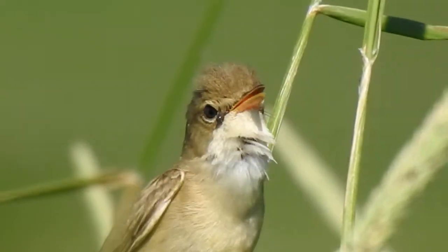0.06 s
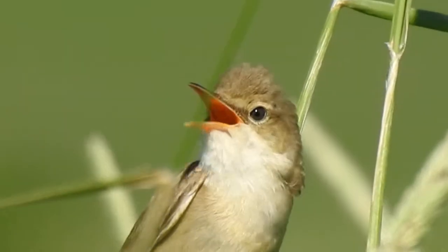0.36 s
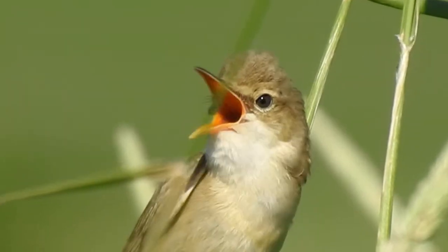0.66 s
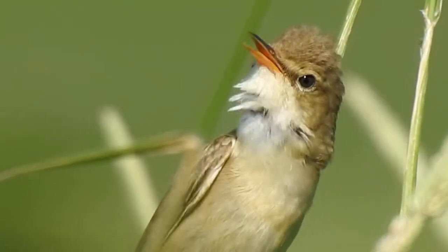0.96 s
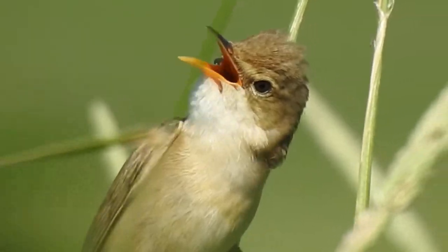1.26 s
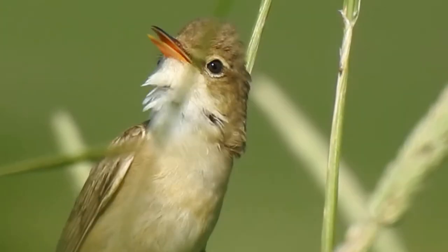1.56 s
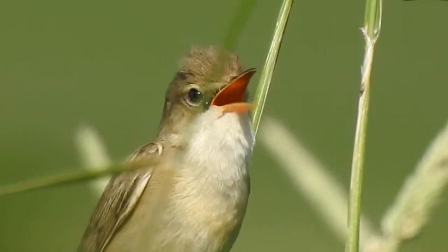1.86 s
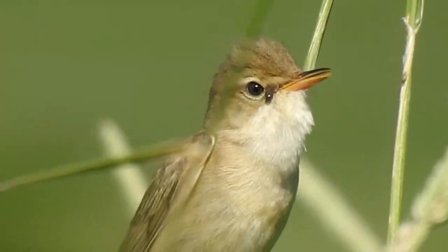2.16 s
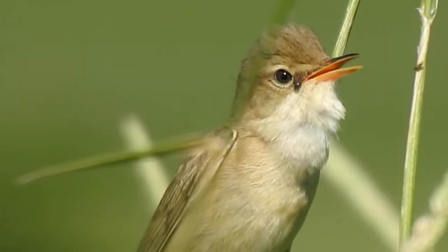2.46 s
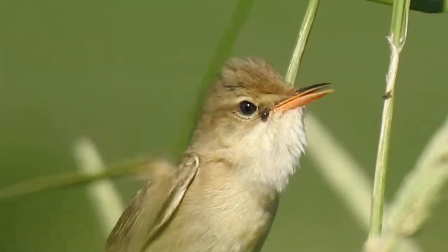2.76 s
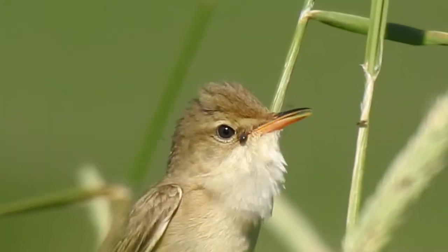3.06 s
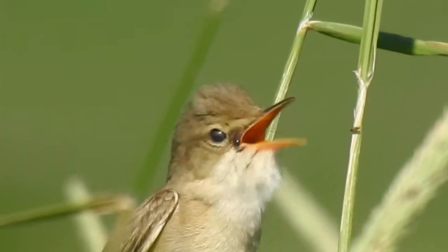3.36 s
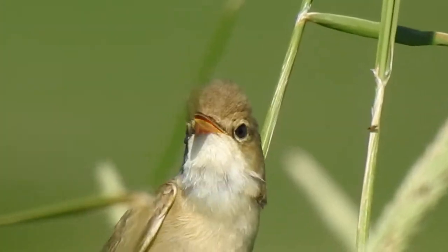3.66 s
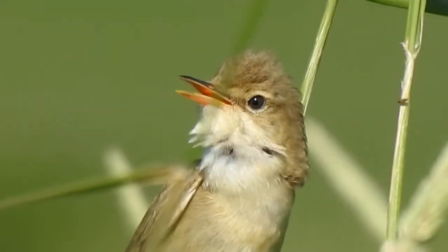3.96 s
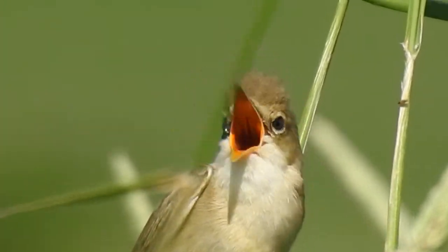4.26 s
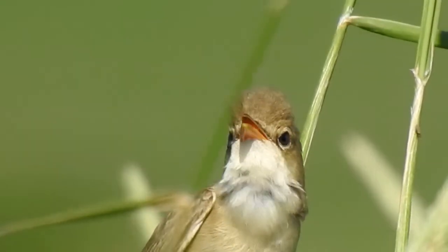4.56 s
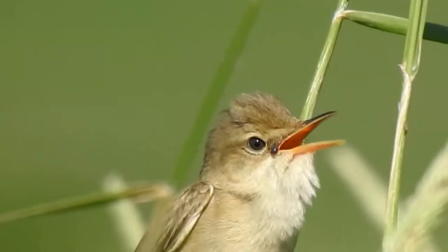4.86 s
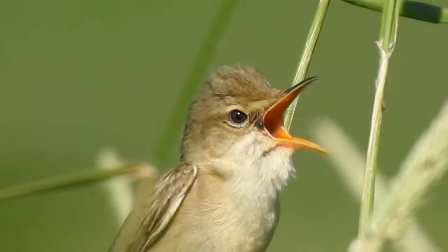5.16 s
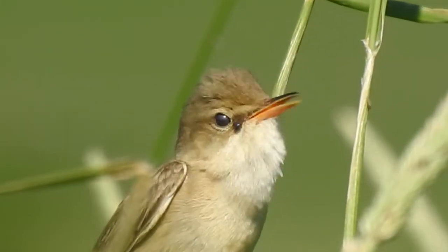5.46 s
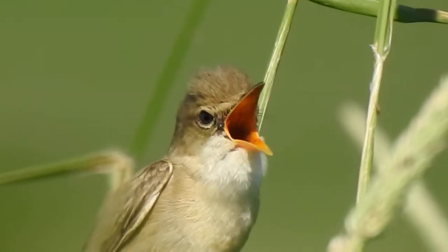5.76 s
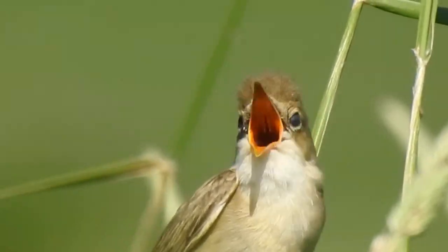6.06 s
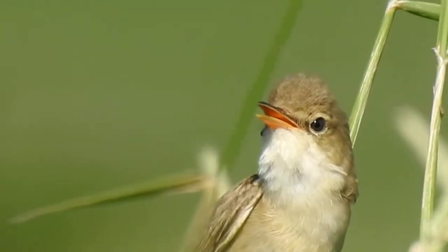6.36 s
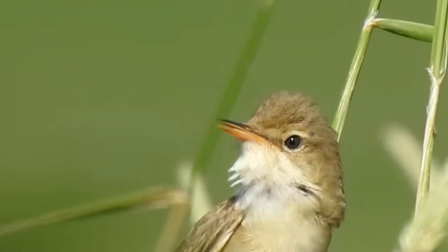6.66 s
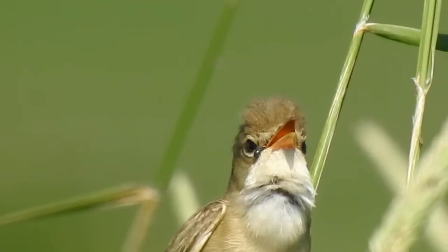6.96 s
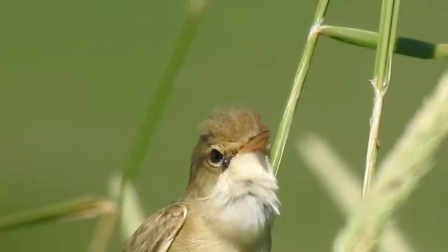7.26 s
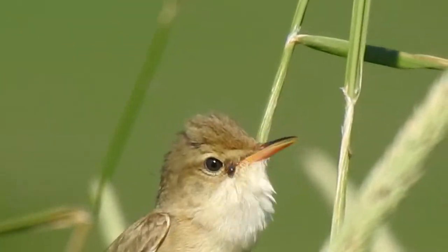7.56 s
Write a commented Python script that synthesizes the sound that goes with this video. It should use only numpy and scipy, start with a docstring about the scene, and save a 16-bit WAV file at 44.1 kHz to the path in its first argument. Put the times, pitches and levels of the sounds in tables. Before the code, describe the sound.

Close to the microphone and a little to the left, a small bird delivers a hurried, varied song among reeds. Scratchy falling whistles and descending trills come first, followed by a repeating mix of short rising calls, buzzy nasal notes, harsh chacks, ticks and climbing trills. Its beak clicks once toward the end. Light wind rustles and rumbles softly, while other birds twitter and a faint tone hums far away.

```python
"""In a reed bed, a warbler sings close to a two-port stereo microphone, a little to the left.
Rasps fall into whistles and trills; then come "wit" calls, nasal notes, chacks, rising series and slurs.
One syrinx makes every note and the throat picks which harmonic carries; the beak snaps once.
Stems scatter the song. Far off, other birds whistle and a thin tone hums; a light wind rustles and rumbles."""
import sys
import numpy as np
from scipy import signal
from scipy.fft import rfft, irfft
from scipy.io import wavfile

SR = 44100
rng = np.random.default_rng(int(sys.argv[2]) if len(sys.argv) > 2 else 0)


def master_out(mix):
    """Clip the mix to full scale and print it as 16-bit PCM to the path in sys.argv[1]."""
    frames = np.transpose(np.atleast_2d(mix))
    ceiling = np.clip(frames, -1, 1)
    pcm = np.round(ceiling * 32767).astype(np.int16)
    wavfile.write(sys.argv[1], SR, pcm)


N = 344862
TOP_HZ = 15750
NASAL_S, PEEP_S = .072, .026  # note lengths

# throat responses with the beak wide open, nearly closed, and set for pure notes: f/Hz, level/dB
OPEN_BEAK = [(700, -63), (2000, -49), (2800, -21), (3600, -11), (4500, -10.5), (5500, 5.5), (6500, 6),
             (7200, -12), (8000, -29.5), (10000, -39), (15000, -71)]
CLOSED_BEAK = [(700, -41), (1500, -16), (2200, 5.5), (2950, 15.5), (3400, 9), (3850, 1), (5000, -2),
               (6000, -2), (7200, -43), (9000, -56)]
PURE_THROAT = [(2000, 29), (4000, 11), (6600, 3), (7400, -18.5), (8100, -13), (14000, -45)]
# whistles, each led in by a rasp: t/s, length/s, top/Hz, shelf/Hz, settling/s, whistle/dB, rasp/dB
RASPED_WHISTLES = [(0.102, 0.12, 3990, 3245, 0.038, -25.5, -28.5),
                   (0.541, 0.1, 3800, 3120, .018, -23.5, -25), (1.01, 0.11, 4360, 3290, 0.015, -22.5, -25),
                   (1.54, 0.14, 4770, 3540, 0.021, -21.5, -24.5),
                   (2.041, 0.11, 3980, 3190, 0.022, -22.5, -24.5)]
# soft nasal notes: t/s, top f/Hz, level/dB
NASAL_NOTES = [(2.445, 729, -37.5), (3.201, 753, -33.5), (3.586, 728, -36.5), (3.999, 731, -37),
               (4.693, 727, -33.5), (5.647, 730, -34), (6.334, 728, -35.5), (7.008, 724, -33.5)]
# short peeps about an octave above them: t/s, f/Hz, level/dB
NASAL_PEEPS = [(4.488, 1574, -29.5), (5.401, 1560, -29), (6.812, 1740, -29.5), (7.737, 1660, -29.5)]
# chacks, each followed by a tick: t/s, top f/Hz, chack/dB, tick/dB
CHACK_CALLS = [(2.733, 923, -19.5, -15.5), (4.909, 923, -21.5, -16), (5.871, 942, -19, -14),
               (7.222, 733, -21.5, -14)]


def undb(db):
    """Decibels to gain."""
    return 10 ** (np.asarray(db) / 20)


def colour(points, hz):
    """Gain of a spectrum (f/Hz, level/dB) at the given frequencies."""
    f, db = np.transpose(points)
    return undb(np.interp(np.log(np.maximum(hz, 1)), np.log(f), db))


def noise(points, size):
    """Coloured noise of rms 1."""
    x = irfft(rfft(rng.standard_normal(size)) * colour(points, np.fft.rfftfreq(size, 1 / SR)), size)
    return x / x.std()


def wide_noise(points, alike_hz=5000):
    """Diffuse sound at two close microphone ports: fairly unlike in the bass, most alike just above it, less so
    again toward the treble."""
    side = [(hz, db - (10 * np.log10(1 + (alike_hz / hz) ** 1.1) if hz > 350 else 3))
            for hz, db in points]
    hz = np.fft.rfftfreq(N, 1 / SR)
    share = np.linalg.norm(colour(side, hz)) / np.linalg.norm(colour(points, hz))
    return noise(points, N) + share * noise(side, N) * np.array([[1], [-1]])


def wander(size, rate):
    """Random values drawn `rate` times a second and joined by lines."""
    at = np.arange(size) * rate / SR
    count = int(at[-1]) + 2
    return np.interp(at, np.arange(count), rng.standard_normal(count))


def ramp(length):
    """Progress 0-1 through a note of `length` seconds."""
    return np.linspace(0, 1, max(int(length * SR), 2))


def swell(u, loudest):
    """A rise and fall that peaks at the share `loudest` of the note."""
    return np.sin(np.pi * np.interp(u, [0, np.clip(loudest, .05, .95), 1], [0, .5, 1])).clip(0)


def bend(u, first, middle, last):
    """A smooth bend of pitch through three points over the progress 0-1."""
    return np.polyval(np.polyfit([0, .5, 1], [first, middle, last], 2), u)


def beats(length, spacing, first_share, settled):
    """Times of pulses that start hurried and reach their steady spacing after `settled` beats."""
    gaps = spacing * np.interp(np.arange(int(2 * length / spacing)), [0, settled], [first_share, 1])
    t = np.append(0, np.cumsum(gaps))
    return t[t < length]


def add(out, start, x):
    """Mix a sound in at `start` seconds."""
    i = max(int(start * SR), 0)
    out[i:i + len(x)] += x[:max(len(out) - i, 0)]


def syrinx(hz, throat, rough, slope_db):
    """Vibrating labia: harmonics shaped by the throat; roughness unsettles period and strength."""
    hz = hz * (1 + .1 * rough * wander(len(hz), 900))
    k = np.arange(1, int(TOP_HZ / hz.min()) + 1)[:, None]
    weight = colour(throat, k * hz) * undb(slope_db * np.log2(k)) * (k * hz < TOP_HZ)
    lag = np.arctan((k * hz - 6000) / 700)  # the windpipe's resonance rings on after each pulse
    stack = np.sum(weight * np.sin(2 * np.pi * k * np.cumsum(hz) / SR - 2 * lag), 0)
    shimmer = 1 + np.clip(rough, 0, .6) * np.tanh(wander(len(hz), 870))
    return stack / np.sqrt(np.sum(weight ** 2, 0)) * shimmer


def notes(table, throat, slope_db, sharpness):
    """Notes whose pitch bends through three points while the air pressure swells and falls."""
    out = np.zeros(N)
    for start, length, first, middle, last, db, loudest, rough in table:
        u = ramp(length)
        tone = syrinx(bend(u, first, middle, last), throat, rough, slope_db)
        add(out, start, undb(db) * swell(u, loudest) ** sharpness * tone)
    return out


def glides(curves, throat, slope_db, quaver_hz, depth, throb_db, calm):
    """Falling notes that start smooth and then quaver in pitch and strength."""
    out = np.zeros(N)
    for curve in curves:
        s, hz, db = np.transpose(curve)
        u = ramp(s[-1] - s[0])
        t = s[0] + u * (s[-1] - s[0])
        turn = 2 * np.pi * np.cumsum(quaver_hz * (1 + .11 * wander(len(u), 63.5))) / SR
        grown = np.clip((u - calm) / .59, .15, 1)
        pitch = np.interp(t, s, hz) * (1 + depth * grown * np.sin(turn))
        flutter_db = throb_db * (.4 - np.sin(turn + 1)) + wander(len(u), 148)
        gain = undb(np.interp(t, s, db) + grown * flutter_db) * np.minimum(swell(u, .39) * 20, 1)
        add(out, s[0], gain * syrinx(pitch, throat, .27, slope_db))
    return out


def wind(rustle_trim_db=1, rumble_trim_db=-1, air_db=-54.5):
    """Gusts rustle the reeds around the microphone over still air; a low rumble comes and goes."""
    # spectra of the leaves, the rumble and still air: f/Hz, level/dB
    rustle_spectrum = [(110, -11), (200, -5), (450, -9.5), (750, -4), (1150, -0.5), (1750, -7.5),
                       (2400, -20), (5000, -26.5), (10000, -65)]
    rumble_spectrum = [(20, -39), (40, -21.5), (60, -4.5), (76, -2), (100, -10.5), (140, -21), (300, -57)]
    air_spectrum = [(100, 2.5), (400, -12.5), (1000, -2), (2000, -6.5), (3200, -6), (6000, -8.5),
                    (8000, -15.5), (15500, -27)]
    # course of the rustle and of the rumble, before trim: t/s, level/dB
    gusts = [(0.0, -45), (0.35, -47), (0.95, -49), (1.39, -46.5), (1.8, -50), (2.41, -46.5), (2.71, -52.5),
             (3.87, -53), (4.36, -53), (4.93, -46.5), (5.97, -55.5), (6.52, -50), (6.86, -54.5), (7.8, -54)]
    rumble_swells = [(0.0, -69), (0.69, -74), (0.91, -48.5), (1.17, -69.5), (2.56, -68), (2.8, -47),
                     (2.89, -67), (2.98, -46.5), (4.06, -52.5), (4.08, -46), (4.97, -72), (5.49, -53),
                     (6.54, -62), (6.69, -52), (7.6, -49), (7.8, -55)]
    t = np.arange(N) / SR
    leaves = wide_noise([(40, -38), *rustle_spectrum])
    leaves *= undb(np.interp(t, *np.transpose(gusts)) + rustle_trim_db + wander(N, 13))
    rumble = noise(rumble_spectrum, N) + .084 * noise(rumble_spectrum, N) * np.array([[1], [-1]])
    rumble *= undb(np.interp(t, *np.transpose(rumble_swells)) + rumble_trim_db)
    return leaves + rumble + undb(air_db) * wide_noise([(40, -20.5), *air_spectrum])


def hum(hz=702):
    """A thin tone in the distance swells and fades."""
    t = np.arange(N) / SR
    level_db = np.interp(t, [0, 2.5, 3, 6.1, 6.45, 6.8], [-62.5, -59, -73, -71.5, -50.5, -65])
    return undb(level_db + 2 * wander(N, 32)) * np.sin(2 * np.pi * hz * t)


def rasps(lead_s=.045, squeak_lead_s=.015):
    """Slow pulses speed up, then break into a rising squeak just before the whistle."""
    pulses = [(s - lead_s, .047, 520, 660, 1150, db, .7, .5) for s, *_, db in RASPED_WHISTLES]
    squeaks = [(s - squeak_lead_s, .016, 2350, 2900, 3800, db + 4, .5, .05)
               for s, *_, db in RASPED_WHISTLES]
    return notes(pulses + squeaks, OPEN_BEAK, slope_db=-3.5, sharpness=.89)


def whistles(sag_hz_per_s=7500, fade_s=.073, fade_db=-23):
    """Each whistle drops from its top to a shelf, sags steadily and fades at the end."""
    curves = []
    for start, length, top, shelf, settle, db, _ in RASPED_WHISTLES:
        t = ramp(length) * length
        hz = shelf + (top - shelf) * np.exp(-(t / settle) ** 2) - sag_hz_per_s * t
        fade = np.maximum(1 - (length - t) / fade_s, 0)
        curves.append(np.transpose([start + t, hz, db + fade_db * fade]))
    return glides(curves, PURE_THROAT, slope_db=-5, quaver_hz=140.5, depth=.11, throb_db=4, calm=.24)


def trill_pips(spacing_s=.0141, lead_s=.01, lead_db=-19, scatter_db=1.5, fade_db=-3):
    """Rows (t/s, f/Hz, level/dB): after a soft lead-in, pips fall out of the throat's resonance."""
    # falling trills: first full pip t/s, length/s, start/Hz, middle/Hz, end/Hz, base level/dB
    falls = [(0.3148, .146, 6170, 5010, 3850, -18), (0.7825, .126, 6270, 5370, 3420, -17),
             (1.27, .17, 6530, 4560, 3600, -21), (1.79, 0.15, 6320, 5180, 4336, -19)]
    # loudness follows pitch: f/Hz, gain/dB
    resonance = [(3600, -18.5), (4500, -13.5), (5200, -6.5), (5800, 1.5), (6600, -0.5)]
    rows = []
    for start, length, first, middle, last, db in falls:
        t = np.append(-lead_s, beats(length, spacing_s, first_share=.73, settled=1.3))
        hz = bend(t / length, first, middle, last)
        level = db + 20 * np.log10(colour(resonance, hz)) + fade_db * t / length
        level += lead_db * (t < 0) + scatter_db * rng.standard_normal(len(t))
        rows += zip(start + t, hz, level)
    return rows


def trills(pips, fall=.27):
    """Each pip is a quick downward flick; the low ones last longer."""
    out = np.zeros(N)
    for s, hz, db in pips:
        length = .0057 * (6000 / hz) ** 2
        u = ramp(length)
        pip = syrinx(hz * np.exp(-fall * (u - .45)), PURE_THROAT, rough=.19, slope_db=-10)
        add(out, s - .45 * length, undb(db) * swell(u, .46) ** 2 * pip)
    return out


def overtone_flicks(table, length, trough_hz, flick_db, follow=.61):
    """Between pulses the pitch dips; its second harmonic flicks through the open throat's resonance."""
    out, u = np.zeros(N), ramp(length)
    for s, hz, db, *_ in table:
        trough = min(trough_hz, .5 * hz)
        pitch = (hz - (hz - trough) * (2 * u - 1) ** 2) * (1 + .03 * wander(len(u), 900))
        tone = colour(OPEN_BEAK, 2 * pitch) * np.sin(4 * np.pi * np.cumsum(pitch) / SR)
        gate = np.minimum(swell(u, .51) * 10, 1)
        add(out, s - length / 2, undb(flick_db + follow * db) * gate * tone)
    return out


def far_birds(trill_hz=55, depth=.017):
    """Thin whistles and trills from across the reed bed."""
    # distant whistles: t/s, length/s, start/Hz, middle/Hz, end/Hz, level/dB
    far_whistles = [(0.909, 0.051, 4240, 3840, 3340, -48), (1.123, 0.046, 3740, 4040, 2970, -54),
                    (2.874, 0.16, 4370, 4200, 4850, -51.5), (3.257, 0.1, 4350, 4500, 4170, -54),
                    (3.504, 0.19, 4080, 4440, 4600, -51), (3.7, 0.043, 5930, 5920, 5760, -50),
                    (4.005, 0.042, 4680, 4400, 4100, -49), (4.763, 0.03, 6120, 5980, 5950, -47.5)]
    # distant trills: t/s, length/s, f/Hz, level/dB
    far_trills = [(3.802, 0.2, 4790, -50), (4.145, 0.26, 4740, -49.5)]
    out = notes([(*row, .5, .18) for row in far_whistles], PURE_THROAT, slope_db=-25, sharpness=.2)
    for start, length, hz, db in far_trills:
        turn = 2 * np.pi * trill_hz * length * ramp(length)
        tone = syrinx(hz * (1 + depth * np.sin(turn)), PURE_THROAT, rough=.23, slope_db=-32)
        add(out, start, undb(db) * np.abs(np.cos(turn / 2)) * tone)
    return out


def twitter(count=30, db=-57):
    """Scattered faint chirps from deeper in the reeds."""
    rows = []
    for when, span, high, curve in rng.random((count, 4)):
        hz = 3200 + 3000 * high
        pitches = hz, hz * (.9 + .15 * curve), hz * (.8 + .5 * curve)
        rows.append((when * N / SR, .025 + .033 * span, *pitches, db, .5, .3))
    return notes(rows, PURE_THROAT, slope_db=-39, sharpness=.98)


def wits(leap_s=.021, scrape_lead_s=.013):
    """A falling chirp and a scrape turn into a rising sweep; the beak opens on its second harmonic."""
    # "wit" calls: sweep t/s, chirp lead/s, chirp/dB, scrape/dB, sweep/dB, squeak/dB
    calls = [(2.345, 0.027, -31, -36, -24.5, -33), (3.479, 0.028, -32, -42, -27, -32),
             (3.888, 0.023, -27, -38, -21.5, -27), (4.583, 0.018, -37, -27.5, -24.5, -32),
             (5.525, .031, -30, -28.5, -21.5, -25), (6.908, .025, -28, -27.5, -22.5, -24)]
    leads, sweeps, squeaks = [], [], []
    for s, lead, chirp_db, scrape_db, sweep_db, squeak_db in calls:
        leads.append((s - lead, .013, 5500, 3750, 2830, chirp_db, .58, .8))
        leads.append((s - scrape_lead_s, .016, 3300, 2950, 3100, scrape_db, .5, 1.1))
        sweeps.append((s, .026, 2150, 3600, 3900, sweep_db, .6, .45))
        squeaks.append((s + leap_s, .021, 2950, 3420, 3630, squeak_db, .3, .3))
    return (notes(leads, PURE_THROAT, slope_db=2, sharpness=.87)
            + notes(sweeps, PURE_THROAT, slope_db=-4.5, sharpness=1.5)
            + notes(squeaks, OPEN_BEAK, slope_db=1, sharpness=1.5))


def nasal_notes():
    """Low, buzzy arches and short peeps, muffled by the nearly closed beak."""
    low = [(s, NASAL_S, .93 * hz, hz, .93 * hz, db, .7, .17) for s, hz, db in NASAL_NOTES]
    peeps = [(s, PEEP_S, 1.02 * hz, hz, .98 * hz, db, .7, .097) for s, hz, db in NASAL_PEEPS]
    return notes(low + peeps, CLOSED_BEAK, slope_db=-4.5, sharpness=.89)


def rough_tails(stretch=2.84, below_db=-9):
    """After each nasal note come a few soft, stuttering scrapes, coloured by the same nearly closed beak."""
    out = np.zeros(N)
    for table, length in (NASAL_NOTES, NASAL_S), (NASAL_PEEPS, PEEP_S):
        for start, _, db in table:
            u = ramp(stretch * length)
            stutter_hz = rng.uniform(24.75, 37.5)
            stutter = np.sin(np.pi * stutter_hz * np.arange(len(u)) / SR) ** 4
            scrapes = (1 - u) ** 1.1 * stutter * noise(CLOSED_BEAK, len(u))
            add(out, start + .37 * length, undb(db + below_db) * scrapes)
    return out


def chacks(length=.06, rough=.2):
    """A low pulse train arches in pitch and rings the open throat."""
    arches = [(s, length, .82 * hz, hz, .68 * hz, db, .5, rough) for s, hz, db, _ in CHACK_CALLS]
    return notes(arches, OPEN_BEAK, slope_db=-5.5, sharpness=1.27)


def ticks(after_s=.096, creak_db=-15):
    """After each chack a short creak opens into a very fast upward sweep."""
    creaks, flicks = [], []
    for s, *_, db in CHACK_CALLS:
        creaks.append((s + after_s - .009, .025, 550, 800, 1400, db + creak_db, .5, .5))
        flicks.append((s + after_s - .001, .014, 3300, 5600, 7900, db, .55, .1))
    return (notes(creaks, OPEN_BEAK, slope_db=-9, sharpness=1)
            + notes(flicks, PURE_THROAT, slope_db=-11, sharpness=3.2))


def series_arches(climb_s=.035, leap_s=.009, arch_s=.015):
    """Rows (t/s, f/Hz, level/dB, length/s): notes climb to a shelf, then leap to the top."""
    # rising series: t/s, length/s, spacing/s, start/Hz, shelf/Hz, top/Hz, leap after/s,
    # top note length/s, base level/dB
    climbs = [(2.9547, .153, .0189, 2050, 3700, 6030, .105, .022, -10.5),
              (5.1355, .165, .0204, 2700, 4150, 7400, .135, .018, -14),
              (6.0845, .145, .0205, 2260, 3900, 5820, .094, .025, -9),
              (7.4522, .161, .0199, 2330, 4100, 6020, .111, .014, -9)]
    # loudness follows pitch: f/Hz, gain/dB
    resonance = [(2200, -28.5), (3000, -22), (3600, -11), (4250, -14), (5000, -9.5), (5750, 0), (6100, -4),
                 (7150, -13)]
    rows = []
    for start, length, spacing, first, shelf, top, leap_at, top_length, db in climbs:
        t = beats(length, spacing, first_share=.84, settled=4)
        leap = 1 / (1 + np.exp((leap_at - t) / leap_s))
        hz = shelf + (first - shelf) * np.exp(-t / climb_s) + (top - shelf) * leap
        level = db + 20 * np.log10(colour(resonance, hz))
        held = leap ** 5
        rows += zip(start + t, hz, level, (1 - held) * arch_s + held * top_length)
    return rows


def rising_series(arches, depth=.375, trim_db=.5):
    """Each note arches up and down, loudest at its top; the highest are flatter, fuller and cleaner."""
    out = np.zeros(N)
    for s, hz, db, length in arches:
        high = np.clip((hz - 5200) / 700, 0, 1)
        u = ramp(length)
        droop = np.abs(2 * u - 1) ** (2 + high)
        pressure = swell(u, .5) ** (2.3 - .6 * high)
        pitch = hz * (1 + depth * (.04 - droop))
        tone = syrinx(pitch, PURE_THROAT, rough=.3 - .23 * high, slope_db=-20)
        add(out, s - length / 2, undb(db + trim_db) * pressure * tone)
    return out


def slurs():
    """Falling, quavering slurs with the beak wide open."""
    # one curve a slur, each point: t/s, f/Hz, level/dB
    curves = [
        [(4.272, 4000, -64.5), (4.293, 3230, -19), (4.32, 2984, -17.5), (4.348, 2670, -22), (4.366, 2560, -45)],
        [(6.59, 3750, -40.5), (6.606, 3080, -15), (6.628, 2740, -16.5), (6.652, 2710, -19.5),
         (6.672, 2620, -31)],
    ]
    return glides(curves, OPEN_BEAK, slope_db=-.5, quaver_hz=114.8, depth=.21, throb_db=-9, calm=.403)


def crackles():
    """Low, rough pulse trains crackle and whine through the wide-open beak."""
    # harsh notes: t/s, length/s, start/Hz, middle/Hz, end/Hz, level/dB, loudest at/0-1, roughness/0-1
    harsh_notes = [(4.39, 0.03, 640, 1400, 520, -17, 0.42, 0.7),
                   (6.707, 0.034, 1600, 500, 2100, -15, 0.28, 0.2),
                   (5.411, 0.047, 1410, 1572, 1360, -34, 0.5, 0.2),
                   (7.744, 0.0235, 1900, 1590, 1540, -33, 0.9, 0.44)]
    return notes(harsh_notes, OPEN_BEAK, slope_db=2.5, sharpness=1.8)


def chirps(length=.0086):
    """Lone upward flicks of the syrinx."""
    # quick chirps: t/s, level/dB
    onsets = [(4.551, -27), (6.875, -32), (7.807, -30)]
    flicks = [(s, length, 2680, 3430, 4700, db, .5, .2) for s, db in onsets]
    return notes(flicks, PURE_THROAT, slope_db=-8, sharpness=.94)


def beak_snap(start_s=7.683, db=-17.5):
    """The mandibles click shut once."""
    spectrum = [(300, -2), (2000, -6), (4500, 10), (7000, 6), (10000, -13), (13000, -13), (15000, -31)]
    out, u = np.zeros(N), ramp(.037)
    envelope = np.exp(-22.35 * u) * np.minimum(u * 20, 1)
    add(out, start_s, undb(db) * envelope * noise(spectrum, len(u)))
    return out


def reeds(x, near_db, far_db, near_t60=.062, far_t60=.2):
    """Nearby stems scatter the sound at once; the reed bed adds a tail, different at each port."""
    t = ramp(.6) * .6
    near, far = (np.exp(-np.log(1000) * t / t60) * (t > .002) for t60 in (near_t60, far_t60))
    near = near * (rng.standard_normal(len(t)) + .043 * rng.standard_normal((2, len(t))))
    far = far * rng.standard_normal((2, len(t)))
    echo = undb(near_db) * near / np.linalg.norm(near[0]) + undb(far_db) * far / np.linalg.norm(far[0])
    return x + signal.fftconvolve(x[None], echo, axes=1)[:, :N]


def off_axis(pair, lag_samples=.65, left_db=1.1):
    """The singer's sound reaches the left port a little later and louder."""
    left = irfft(rfft(pair[0]) * np.exp(-2j * np.pi * np.fft.rfftfreq(N) * lag_samples), N)
    return np.array([left * undb(left_db / 2), pair[1] * undb(-left_db / 2)])


def scene():
    """The singer close to the microphone, other birds deep in the reeds, wind and a faint hum."""
    pips, arches = trill_pips(), series_arches()
    song = trills(pips) + rising_series(arches) + rasps() + chacks() + ticks() + wits() + chirps()
    song += nasal_notes() + rough_tails() + beak_snap()
    song += overtone_flicks(pips, length=.02, trough_hz=2740, flick_db=-27.5)
    song += overtone_flicks(arches, length=.016, trough_hz=2550, flick_db=-32)
    song += whistles() + slurs() + crackles()
    distant = reeds(far_birds() + twitter(), near_db=-14, far_db=-5)
    close = off_axis(reeds(song, near_db=-9, far_db=-20.5))
    return close + distant + wind() + hum()


def record(dry):
    """The recorder cuts the top treble steeply."""
    return signal.sosfilt(signal.ellip(10, .2, 70, TOP_HZ, fs=SR, output="sos"), dry)


dry = scene()
out = record(dry)
master_out(out)
```